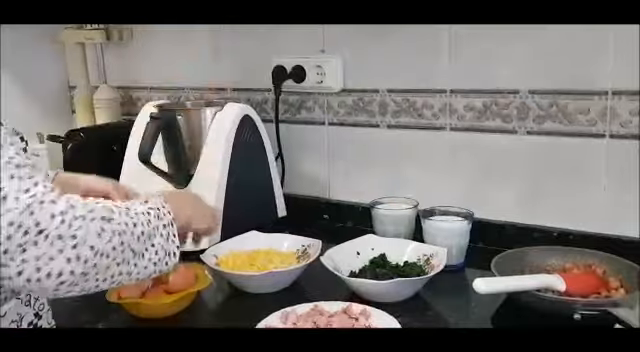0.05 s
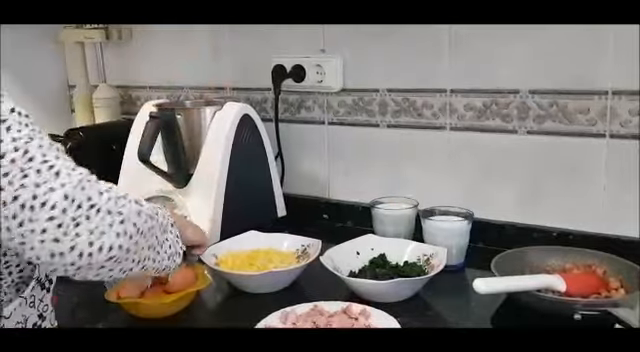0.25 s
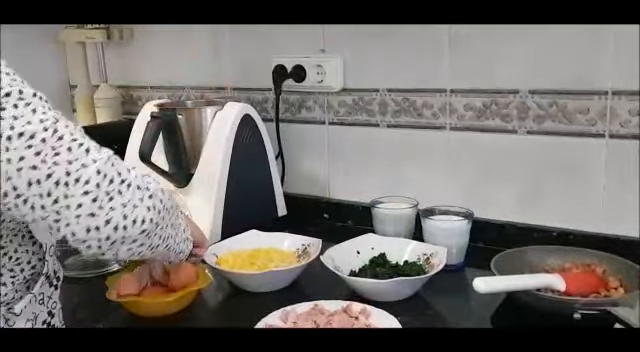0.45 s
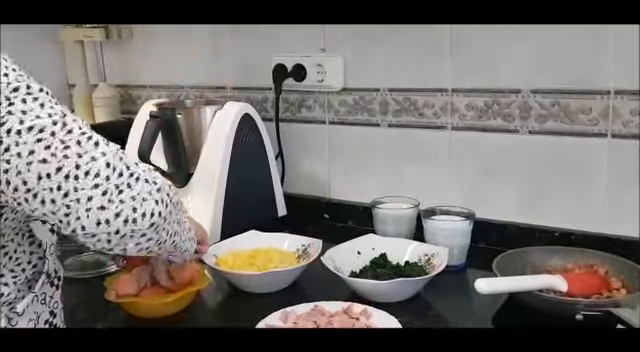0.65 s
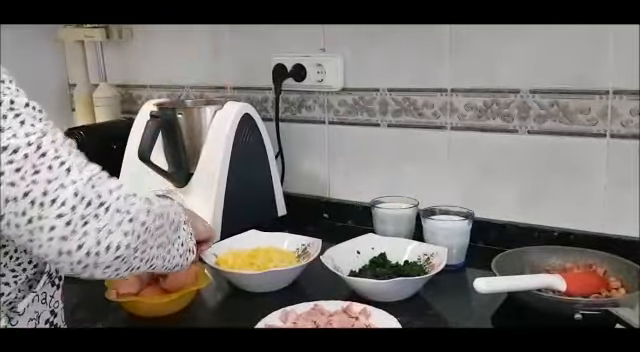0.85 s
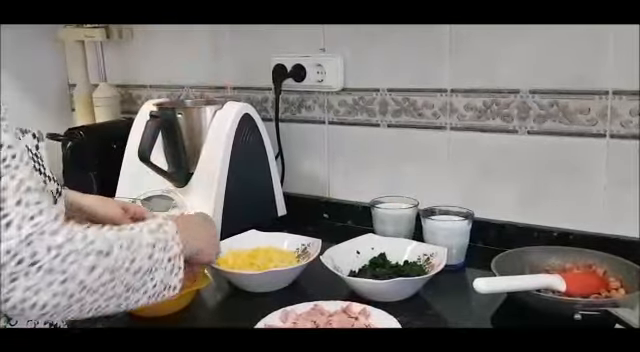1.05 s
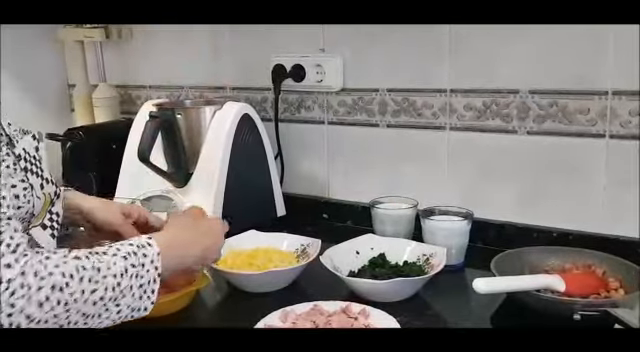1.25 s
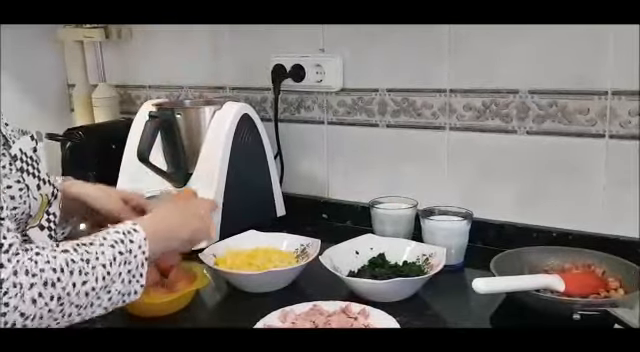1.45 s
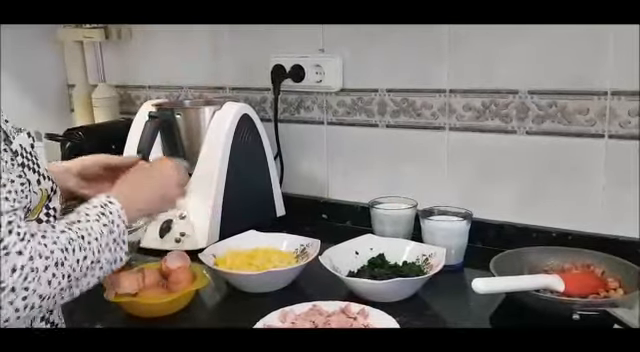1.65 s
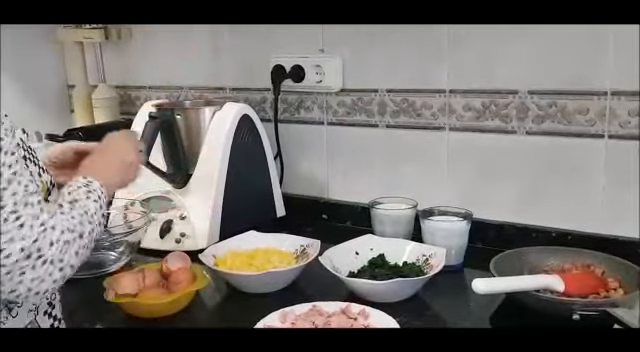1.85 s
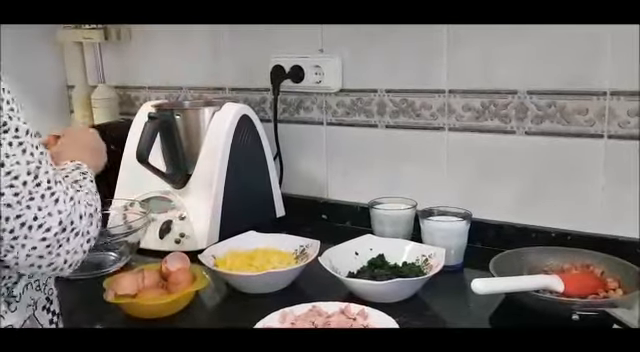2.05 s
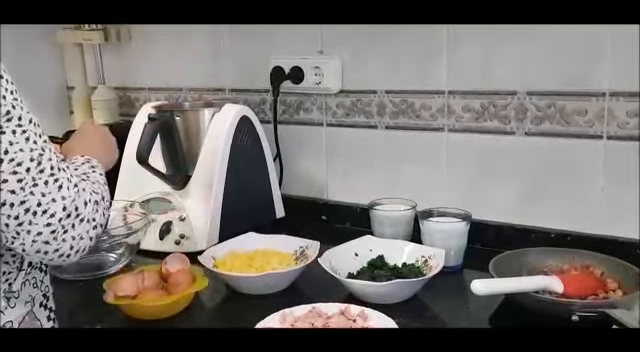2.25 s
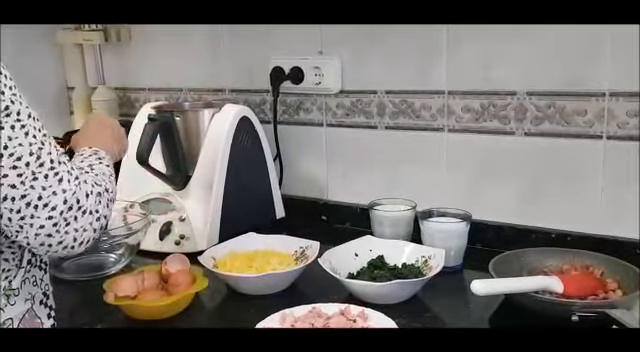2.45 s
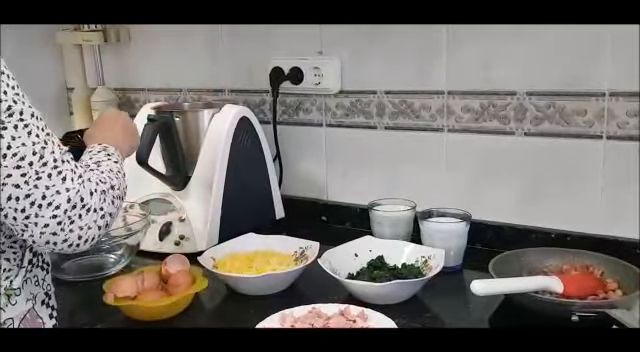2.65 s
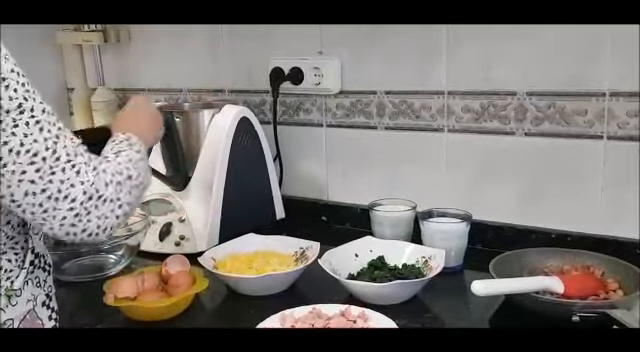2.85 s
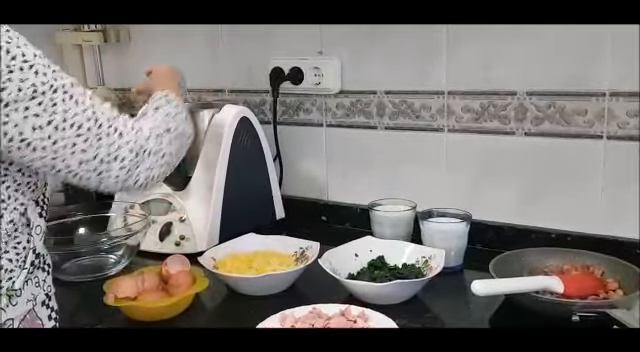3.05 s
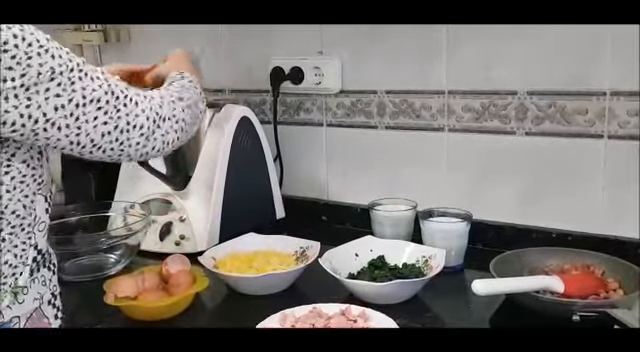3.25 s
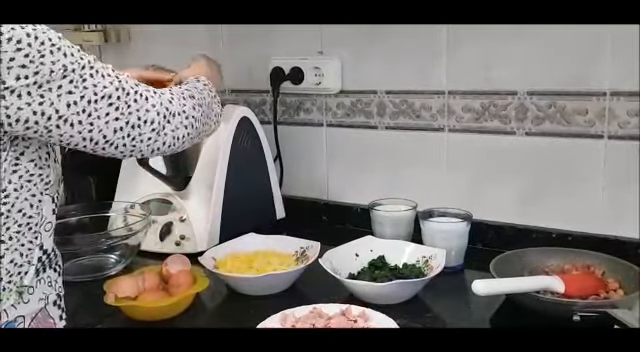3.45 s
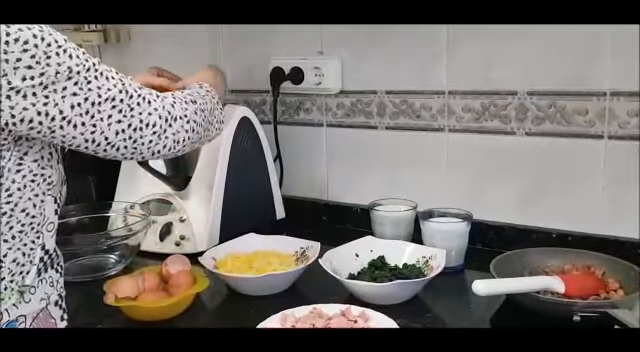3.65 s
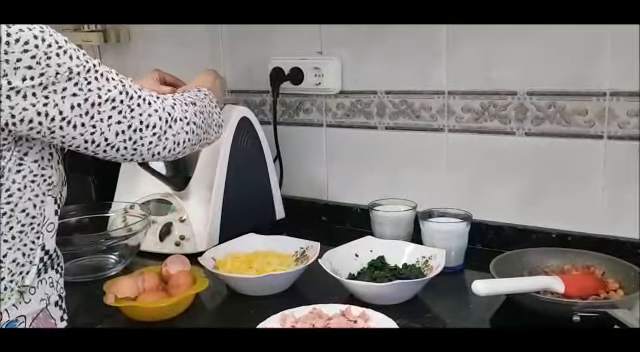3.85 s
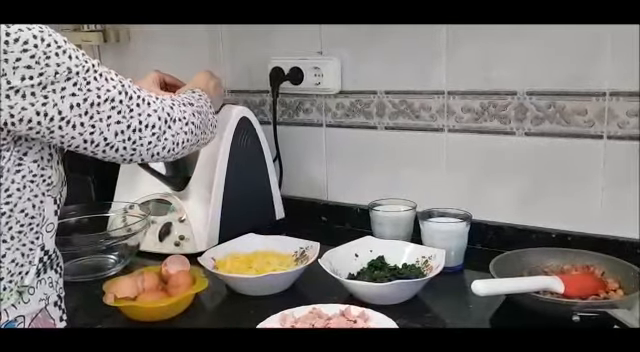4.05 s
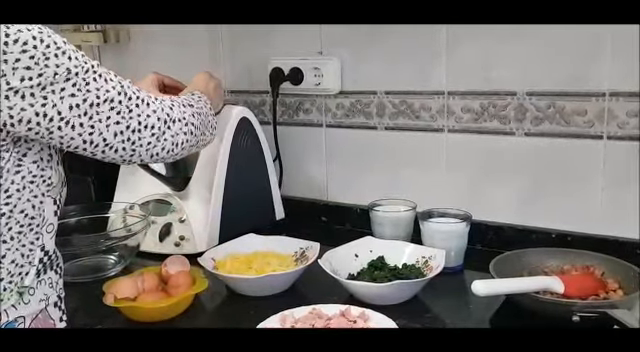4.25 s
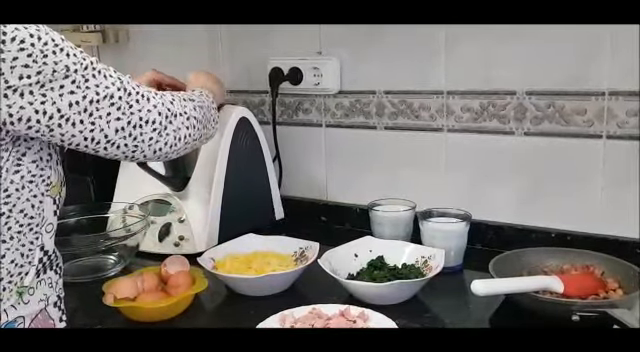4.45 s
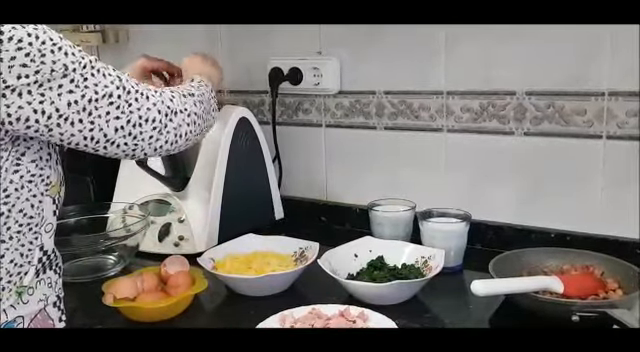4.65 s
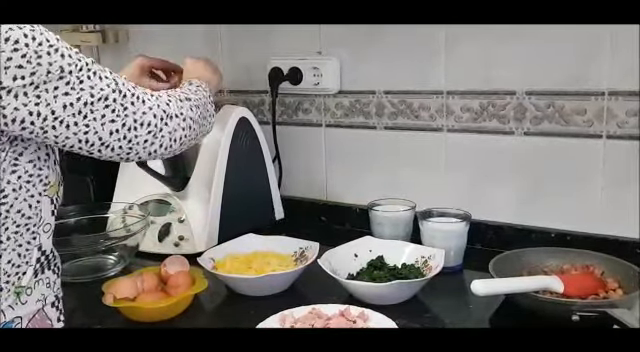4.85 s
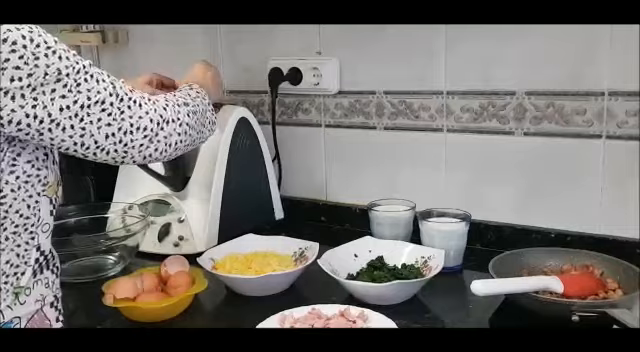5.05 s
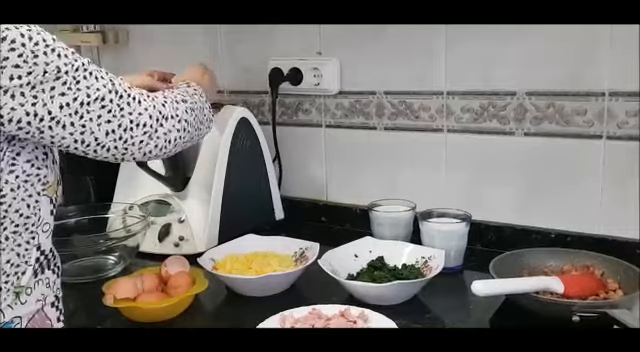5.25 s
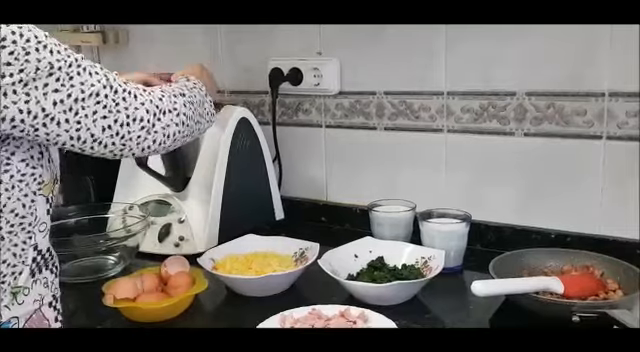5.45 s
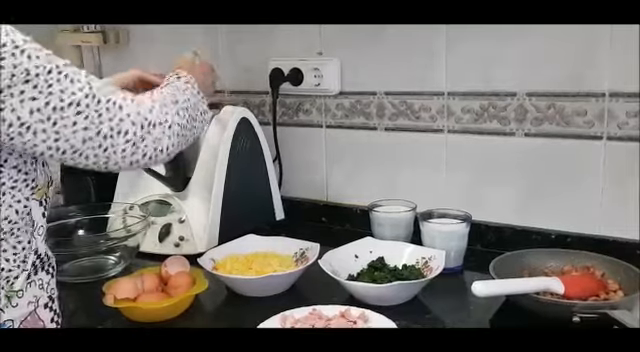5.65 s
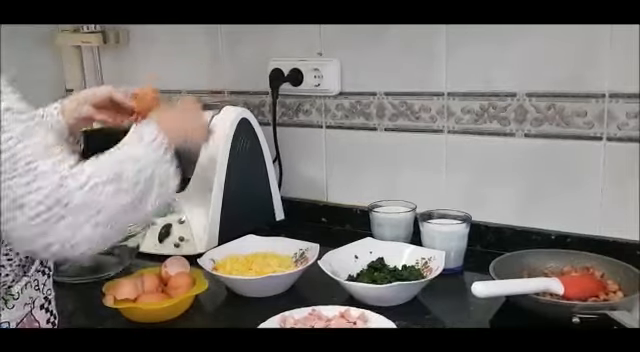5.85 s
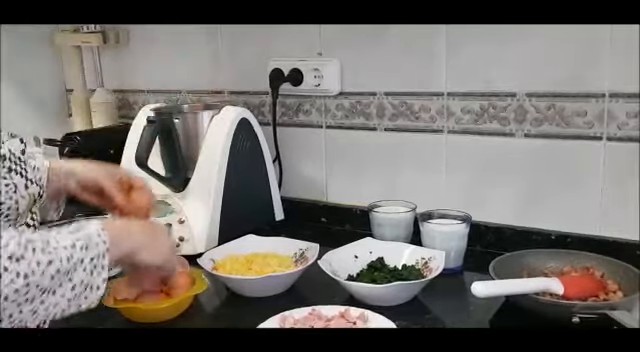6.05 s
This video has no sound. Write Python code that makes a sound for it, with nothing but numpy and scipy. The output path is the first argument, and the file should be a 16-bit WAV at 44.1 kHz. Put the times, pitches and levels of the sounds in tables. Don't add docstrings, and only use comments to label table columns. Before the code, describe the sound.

Eggshells clink and crunch in a bowl, then an egg is knocked sharply twice on a machine rim, crackles and is pulled open.

```python
import sys
import numpy as np
from scipy import signal
from scipy.fft import rfft, irfft
from scipy.io import wavfile
from scipy.ndimage import uniform_filter1d

SR = 44100
rng = np.random.default_rng(int(sys.argv[2]) if len(sys.argv) > 2 else 0)


def unload_audio(sound):
    columns = np.transpose(np.atleast_2d(sound))
    steps = np.round(np.clip(columns, -1, 1) * 32767)
    wavfile.write(sys.argv[1], SR, steps.astype(np.int16))


def elevation(decibels):
    levels = np.asarray(decibels, float)
    return 10 ** (levels / 20)


N = 269568

# frequency in Hz, level in dB.
SHELL_RADIATION = [(1800, 0.5), (2550, -3.5), (3700, 0.5), (5400, 1.5), (7000, -1.5), (8800, 1),
                   (13000, -1.5), (14600, 2.5)]


def evened(x):
    return x / np.sqrt(np.mean(x ** 2) + 1e-20)


def read(points, hz):
    f, value = np.transpose(points)
    return np.interp(np.log(hz + 1), np.log(f + 1), value)


def add(mix, start_s, sound):
    part = mix[max(round(start_s * SR), 0):][:len(sound)]
    part += sound[:len(part)]


def shape(x, gain):
    n = x.shape[-1]
    return irfft(rfft(x) * gain(np.fft.rfftfreq(n, 1 / SR)), n)


def smoothed(x, width):
    return uniform_filter1d(uniform_filter1d(x, width), width)


def paired(z, hz):
    # frequency in Hz, left-right likeness from 0 to 1.
    likeness = [(60, 0.82), (130, 0.71), (290, 0.84), (640, 0.5), (1410, 0.02), (3100, 0.05), (6820, 0.01),
                (15000, 0.01)]
    same = np.clip(read(likeness, hz), -1, 1)[:, None]
    return np.array([z[0], same * z[0] + np.sqrt(1 - same ** 2) * z[1]])


def ring(hz, t60_s):
    t = np.arange(8000) / SR
    return np.sin(2 * np.pi * hz * t) * elevation(-60 * t / max(t60_s, .002))


def small(x):
    return shape(x, lambda f: f ** 2 / (f ** 2 + 450 ** 2))


def lifted(steady_db, swells):
    t = np.arange(N) / SR
    power = elevation(2 * steady_db)
    for middle_s, half_s, db in swells:
        power = power + elevation(2 * db) * np.exp(-((t - middle_s) / half_s) ** 2)
    return np.sqrt(power)


def air():
    # frequency in Hz, density in dB per Hz.
    hum_spectrum = [(15, -28), (25, 7), (54, 3.5), (98, -8.5), (140, -1), (171, -22.5), (209, 8),
                    (245, -14.5), (288, -5), (505, -16), (642, -17), (1170, -38.5), (1710, -22.5),
                    (1930, -40.5), (3000, -54.5), (3900, -104), (6600, -120)]
    hiss_spectrum = [(1180, -7.5), (2000, -5.5), (2450, -13.5), (2950, -15), (3230, -15), (4600, -10.5),
                     (6600, -10.5), (8250, -8.5), (15200, -5.5), (16200, -7), (16600, -31.5)]
    # frequency in Hz, level in dB.
    drones = [(220.7, -70.5), (269.2, -72), (635.2, -77.5)]
    # middle in seconds, half length in seconds, rumble in dB, rustle in dB.
    moves = [
        (0.02, 0.22, -93, -65),
        (0.515, 0.25, -56.5, -71),
        (1.01, 0.07, -66, -49.5),
        (1.3, 0.31, -56, -72),
        (2.147, 0.43, -81, -63.5),
        (2.846, 0.096, -58.5, -69),
        (3.47, 0.233, -56, -85),
        (4.457, 0.14, -71.5, -63),
        (4.98, 0.12, -63.5, -91),
        (5.503, 0.32, -58, -73),
    ]
    hum_db, hum_wander_db, hiss_db = -62, 0.5, -74.5

    frames, hz = N // 512 + 5, np.fft.rfftfreq(2048, 1 / SR)
    a, b, c, d, patches = rng.standard_normal((frames, 1025, 5)).T
    patches = evened(uniform_filter1d(uniform_filter1d(patches, 10, 0), 8, 1))
    z = paired([a + 1j * b, c + 1j * d], hz) * elevation(1.7 * patches)

    middle_s, half_s, rumble_db, rustle_db = np.transpose(moves)
    wander = elevation(hum_wander_db * evened(smoothed(rng.standard_normal(N), 6000)))
    hum_level = wander * lifted(hum_db, zip(middle_s, half_s, rumble_db))
    hiss_level = lifted(hiss_db, zip(middle_s, half_s, rustle_db))
    out = 0
    for spectrum, level in (hum_spectrum, hum_level), (hiss_spectrum, hiss_level):
        layer = signal.istft(z * elevation(read(spectrum, hz))[:, None], nperseg=2048, noverlap=1536)[1][:, :N]
        out = out + level * evened(layer)

    for (line_hz, db), waver in zip(drones, rng.standard_normal((len(drones), 2, N))):
        drift, swell = evened(smoothed(waver, 3000))
        phase = 2 * np.pi * np.cumsum(line_hz + 3.27 * drift) / SR
        out = out + elevation(db + 2.0 + 2 * swell) * np.sin(phase)
    return out


def kitchen(x, count=3):
    # frequency in Hz, t60 in seconds.
    decay = [(100, 0.26), (260, 0.4), (700, 0.35), (1840, 0.35), (4850, 0.35), (12800, 0.27)]
    first_s = .0015
    t, out = np.arange(SR) / SR, np.zeros((2, N))
    for k in range(count):
        chance = np.minimum(1500 + 2.0e5 * t, 9000) / SR
        taps = rng.choice([-1., 1.], (2, SR)) * (rng.random((2, SR)) < chance)
        onset = np.clip((t - first_s) / 0.00028, 0, 1)
        taps = taps * onset / np.sqrt(np.minimum(1500 + 178000.0 * t, 9000))
        hz, frame_s, z = signal.stft(taps, SR, nperseg=256)
        z = paired(z, hz) * elevation(-60 * frame_s / read(decay, hz)[:, None])
        tail = signal.istft(z, SR, nperseg=256)[1][:, :SR] * (t > first_s)
        tail = tail / np.linalg.norm(tail[0])
        turn = np.sqrt(2 / count) * np.cos(np.pi * (1.7 * np.arange(N) / SR + k / count))
        out += signal.fftconvolve((x * turn)[None], tail, axes=1)[:, :N]
    return out


def counter(x):
    t = np.arange(1500) / SR
    fading = elevation(-5 - 60 * t / .04) * (t > .0008)
    echoes = rng.choice([-1., 1.], (2, 1500)) * (rng.random((2, 1500)) < 1400 / SR) * fading
    echoes[[0, 1], [0, 7]] = 1
    return signal.oaconvolve(x[None], echoes, axes=1)[:, :N]


def thud(db, contact_s, feet_db):
    # frequency in Hz, level in dB, t60 in seconds.
    housing_modes = [(157.7, -4, 0.81), (214.4, -9.5, 0.92), (287.8, 6, 0.37), (507.5, 0, 0.33),
                     (676, -9, 0.3), (725, -40, 0.33)]
    feet_modes = [(70, -14, 0.33), (128.6, -6.5, 0.41)]
    t = np.arange(SR // 2) / SR
    sound = 0
    for modes, lift_db in (housing_modes, 0), (feet_modes, feet_db):
        for hz, level_db, t60_s in modes:
            sound = sound + elevation(level_db + lift_db - 60 * t / (0.66 * t60_s)) * np.sin(2 * np.pi * hz * t)
    push = np.hanning(max(round(contact_s * SR), 5))
    sound = signal.oaconvolve(sound * (1 - np.exp(-t / 0.0033)), push)
    return elevation(db - 4.5) * sound / abs(sound).max()


def machine():
    # start in seconds, housing ring in dB, contact in seconds, puff in dB, feet in dB.
    pushes = [
        (0.512, -35.5, 0.00083, -35.5, -14),
        (0.998, -38, 0.0026, -45, 0),
        (1.471, -38, 0.00067, -48, -6),
        (2.48, -23, 0.0041, -30, 2.5),
        (2.74, -22, 0.0041, -31, 0.7),
        (3.418, -54, 0.0029, -54, 0.5),
        (3.515, -56, 0.0035, -71, -2),
        (5.371, -39.5, 0.003, -45, 3),
        (5.417, -35, 0.0028, -48.5, -0.5),
    ]
    housing, puffs = np.zeros((2, N))
    for start_s, db, contact_s, puff_db, feet_db in pushes:
        add(housing, start_s - .002, thud(db, contact_s, feet_db))
        add(puffs, start_s, elevation(puff_db + 14) * ring(0.85 / max(contact_s, 5e-4), 3.0 * contact_s))
    return housing, puffs


def rubbing(length_s, clatter_db, grit_db, hz):
    t = np.arange(0, length_s, 1 / SR)
    pressure = elevation(np.interp(t / length_s, [0, 0.33, 1], [-15.5, 0, -14]))
    sign, size, draw, shell = rng.random((len(t), 4)).T
    contacts = np.sign(sign - .5) * elevation(-5.0 * np.log(size + 0.021)) * (draw < 500 / SR)

    clatter, r = 0, np.exp(-np.pi * 650 / SR)
    sizes = (.66, 1.4), (.88, -.3), (1.08, -0.4), (1.4, -0.4), (.55, -9), (2.2, -10.5)
    for k, (ratio, db) in enumerate(sizes):
        turn = np.exp(2j * np.pi * ratio * hz * t)
        taps = contacts * (np.floor(4 * shell) == k % 4) / turn
        clatter = clatter + elevation(db) * (turn * signal.lfilter([1], [1, -2 * r, r * r], taps)).real

    def grit_gain(f):
        return elevation(read(SHELL_RADIATION, f)) / (1 + (3000 / (f + 1)) ** 4) / (1 + (f / 11000) ** 2)

    grit = shape(contacts, grit_gain)
    fade = pressure * signal.windows.tukey(len(t), .05)
    return fade * (elevation(clatter_db - 10.0) * evened(clatter) + elevation(grit_db - 8.5) * evened(grit))


def knock(db, hz, t60_s, slap_db):
    sound = ring(hz, t60_s) + 0.13 * ring(1.1 * hz, 0.2 * t60_s)
    sound = sound + elevation(slap_db + 5.5) * ring(0.8 * hz, 0.0013)
    sound = sound * (1 - np.exp(-np.arange(len(sound)) / SR / 0.00032))
    return elevation(db - 3.5) * sound / abs(sound).max()


def knocking():
    # start in seconds, blow in dB, pitch in Hz, room in dB.
    slaps = [(0.385, -30, 1920, 2.5), (0.409, -35, 1700, 6), (0.498, -29.5, 1580, 10),
             (0.612, -38.5, 1440, 14), (.585, -38, 1590, 11), (.635, -40, 1490, 8.5),
             (0.724, -27.5, 1830, 2.5), (0.754, -35.5, 1860, 8), (0.925, -29, 1110, 6),
             (0.948, -25.5, 1990, 1), (0.975, -30, 1890, 13), (1.016, -20, 1980, 4.5),
             (1.254, -31.5, 1740, 6), (1.31, -35, 1600, 5), (1.344, -21, 2230, -0.5),
             (1.377, -12, 2020, 2.5), (1.416, -22, 2330, 0), (1.475, -15, 1700, -3),
             (1.565, -19.5, 1500, 1), (1.65, -29, 1700, 1), (1.739, -28, 1960, 7.5),
             (2.476, -17, 2270, -1.5), (2.742, -24, 1220, 7), (3.455, -54.5, 2450, 3),
             (3.969, -46, 1690, 2), (4.447, -47.5, 1940, 7), (5.169, -52, 2630, 4.5),
             (5.561, -37.5, 2200, 7.5)]
    # start
    # in seconds, blow in dB, pitch in Hz, t60 in seconds.
    clinks = [(0.178, -53, 1270, 0.032), (0.279, -42.5, 1430, 0.0075), (.475, -38, 1450, .012),
              (0.522, -34, 1320, 0.018), (0.5674, -36, 1300, 0.009), (.8412, -45, 2160, 0.0093),
              (.8886, -46, 2160, 0.011), (.906, -41, 2470, 0.0066), (1.011, -39, 1800, 0.011),
              (1.2138, -42, 2600, 0.0087), (1.2442, -36, 1650, 0.015), (1.356, -35, 2140, .01),
              (1.347, -31, 1150, .006), (1.39, -26, 1150, .006), (.895, -38, 1050, .008),
              (.82, -46, 2900, .006), (1.364, -37, 1990, .01), (1.57, -27.5, 1140, 0.016),
              (1.76, -38.5, 2054, .015), (5.3, -45, 2670, .012), (5.386, -54, 2690, 0.015),
              (5.56, -46, 1330, .03), (0.995, -21, 1530, 0.022), (1.029, -27, 1500, 0.009),
              (1.089, -27.5, 1325, 0.021), (1.151, -37, 1306, 0.026), (1.238, -33, 1490, 0.0045),
              (1.441, -21, 1210, 0.0077), (1.594, -29.5, 1150, 0.03), (1.619, -29.5, 1620, 0.025),
              (1.7, -33, 1710, 0.017), (.95, -33, 1250, .008), (.992, -32, 2700, .005),
              (1.19, -45, 2700, .008), (.86, -41, 1000, .008),
              (4.57, -50, 2500, .008), (5.372, -43, 1850, .012), (5.575, -44, 3900, .005),
              (5.61, -47, 3300, .006), (2.448, -55.5, 2320, 0.012), (2.4805, -14.5, 1300, 0.0067),
              (2.475, -22, 2200, .005), (2.494, -24, 1240, .025), (3.967, -57, 1500, 0.019),
              (4.2515, -36.5, 1350, 0.0055), (4.261, -52, 2680, 0.0027), (4.445, -33.5, 1326, 0.021),
              (4.4996, -31, 1723, 0.02), (4.507, -39, 1510, .03), (4.518, -37.5, 1400, 0.022),
              (4.549, -46.5, 1610, .025), (5.251, -35.5, 2200, 0.011), (5.298, -35.5, 2110, 0.018),
              (5.307, -41, 2360, 0.013), (5.39, -43, 2300, 0.012), (5.573, -39, 1890, 0.011),
              (5.318, -44, 1817, 0.04), (5.382, -40, 2120, 0.012), (5.457, -51, 2990, 0.012),
              (5.534, -44, 1890, 0.015), (5.586, -37, 1865, 0.014)]
    # start in seconds, level in dB, frequency in Hz, t60 in seconds, room in dB.
    ringing_modes = [(4.259, -49, 3880, 0.062, -7), (4.264, -53, 489, 0.07, 1), (4.259, -61.5, 2370, 0.037, 0),
                     (4.5175, -48, 8300, 0.0089, 4), (4.5175, -50, 5300, 0.011, 9), (4.446, -56, 8300, .006, 7),
                     (4.566, -47.5, 1340, 0.11, -9), (2.48, -35, 674, 0.16, -9.5), (2.485, -37, 560, .05, 6),
                     (2.482, -30, 1157, .12, -6), (2.742, -39, 705, 0.3, -5), (2.744, -35, 400, .04, 5),
                     (2.484, -36, 880, 0.1, -5.5), (2.478, -39, 790, .04, -4.5), (2.74, -39.5, 3080, 0.0042, 5.5),
                     (2.74, -43, 1650, 0.0058, 6), (2.477, -41, 2850, .03, -4), (2.485, -40, 2300, 0.11, -4.5),
                     (5.41, -48.5, 370, .15, -2), (2.482, -32.5, 1270, 0.17, -8), (1.343, -31.5, 2100, .018, -9),
                     (2.745, -43, 1300, 0.16, -3), (4.2536, -48, 4900, 0.025, -1), (4.2526, -48, 6200, 0.018, 6),
                     (4.2522, -46.5, 4870, 0.0099, 5), (4.518, -51, 4270, 0.0081, 7), (2.478, -31, 710, 0.008, 1.5),
                     (2.495, -28.5, 1600, 0.013, 1.5), (2.74, -37, 707, 0.02, 3), (5.385, -45, 436, 0.23, -1.5),
                     (5.303, -50.5, 1320, 0.043, -1),
                     (1.345, -42, 2800, .008, 0),
        (1.383, -35.5, 2970, .01, 2.5),
        (1.355, -45, 2900, .008, 0),
        (1.44, -48, 3700, .008, 5),
        (1.474, -44.5, 3650, 0.011, 4),
        (5.175, -62, 3800, .006, 9),
        (3.47, -70.5, 2500, 0.017, 7),
        (2.8, -56, 1800, .03, -1),
        (2.752, -50, 3100, .02, 5),
        (2.742, -32.5, 563, 0.018, 1.5),
    ]
    # start in seconds, length in seconds, clatter in dB, grit in dB, pitch in Hz.
    strokes = [(0.203, 0.43, -58, -68.5, 1370), (0.401, 0.22, -40.5, -58, 1540),
               (0.519, 0.25, -54, -67, 1460), (0.76, 0.22, -43.5, -58, 1610), (0.451, 0.15, -43, -47, 1350),
               (0.561, 0.1, -38, -56.5, 1587), (0.823, 0.064, -48, -47.5, 2130),
               (0.89, 0.051, -41, -54, 2100), (1.208, 0.089, -40, -58.5, 1700),
               (0.86, 0.22, -36, -43.5, 1480), (1.094, 0.28, -48.5, -53, 1580),
               (1.256, 0.16, -68, -51.5, 1700), (1.519, 0.227, -36.5, -56, 1660),
               (1.601, 0.22, -45, -55, 2050), (3.38, 0.17, -74, -66.5, 2220),
               (3.952, .16, -61.5, -74, 1610), (4.441, 0.25, -53.5, -69, 1510),
               (5.197, 0.36, -54, -52.5, 2100), (5.401, 0.24, -50, -54.5, 1920)]
    # frequency in Hz, level in dB, t60 in seconds.
    bowl_modes = [(525, -0.5, .03), (680, 0.5, .03), (860, -3.5, 0.021)]
    bowl_db, bowl_until_s = -65.5, 1.9

    straight, spread, rest = np.zeros((3, N))
    blows = [(s, db, hz, 0.017, 19, room_db) for s, db, hz, room_db in slaps]
    for s, db, hz, t60_s in clinks:
        room_db = 2.5 - 3.5 * np.log2(t60_s / 0.011)
        blows.append((s, db, hz, t60_s, -19, room_db))
    for start_s, *blow, room_db in blows:
        add(straight, start_s - .001, knock(*blow))
        add(spread, start_s - .001, elevation(room_db + 1.5) * knock(*blow))
    for start_s, db, hz, t60_s, room_db in ringing_modes:
        add(straight, start_s, elevation(db + 9.0) * ring(hz, t60_s))
        add(spread, start_s, elevation(db + 4.5 + room_db) * ring(hz, t60_s))
    for start_s, *stroke in strokes:
        add(rest, start_s, rubbing(*stroke))

    body = sum(elevation(db) * ring(hz, t60_s) for hz, db, t60_s in bowl_modes)
    drive = (straight + rest) * (np.arange(N) < bowl_until_s * SR)
    bowl = elevation(bowl_db) * evened(signal.oaconvolve(drive, body)[:N])
    return small(np.array([elevation(-1) * straight + rest + bowl, spread + rest + bowl]))


def snap(db, hz, octaves, flat, noise):
    t = np.arange(len(noise)) / SR
    parts = np.array([t == 0, 0.12 * noise * abs(noise) * np.exp(-t / 0.0028)])
    parts = np.roll(parts, 256, axis=1)

    def crack_gain(f):
        peak = np.exp(-.5 * (np.log2((f + 1) / hz) / max(octaves, .1)) ** 2)
        return elevation(read(SHELL_RADIATION, f)) * (abs(flat) * f / (f + 1500) + peak)

    click, splinters = shape(parts, crack_gain)
    return elevation(db + 5.5) * np.array([click + splinters, click]) / abs(click).max()


def cracking():
    # start in seconds, snap in dB, brightest frequency in Hz, breadth from 0 to about 1.
    shards = [(0.3002, -49, 5770, 0.1), (0.384, -32.5, 6050, 0.6), (0.3895, -24.5, 3800, 0.77),
              (.345, -58, 5500, .1), (.401, -29.5, 6000, .6), (.415, -33, 4500, 0.4),
              (0.4768, -33, 4160, 0.26), (.51, -32.5, 5950, 0.2), (.675, -52, 6000, .15),
              (.829, -36, 6500, 0.5), (.846, -33, 5260, 0.4), (.858, -36, 5500, .3), (.905, -34, 6000, 0.2),
              (1.011, -26, 9000, .3), (1.021, -23, 9490, .5), (1.032, -31, 8000, 0.5),
              (1.225, -40, 5500, 0.06), (1.245, -38, 5300, 0.2), (1.26, -43, 4500, .2),
              (1.33, -38, 7000, .5), (1.381, -19, 12500, 0.7), (1.58, -38, 9200, 0.5),
              (1.651, -37, 8000, .5), (1.477, -28.5, 4930, 0.35), (1.7432, -29.5, 9000, 0.4),
              (1.757, -38, 6000, 0.2), (0.7243, -38, 5990, .4), (0.7532, -35, 5470, 0.4),
              (0.8367, -34, 5796, 0.3), (0.9702, -24, 3673, 1), (1.0161, -13.5, 8090, 0.48),
              (1.0869, -21.5, 11560, 1), (1.1508, -32.5, 4680, 1), (1.3763, -13.5, 11600, 0.24),
              (1.3902, -31, 5640, 0.08), (1.5628, -29.5, 3310, 0.22), (1.5943, -23.5, 3930, 0.66),
              (1.6801, -37, 3814, 0.9), (1.7389, -29, 5660, 1)]
    cracks = [(2.4758, -3.5, 7750, 0.95), (2.4816, -12, 11700, 0.09), (2.738, -9.5, 5450, 1.1),
              (3.4441, -40, 11670, 0.8), (3.53, -41.5, 9160, 0.05), (3.948, -46, 9040, 0.45),
              (3.969, -39, 8500, 0.3), (4.1962, -49.5, 8660, 0.13), (4.2528, -25.5, 5350, 0.13),
              (4.2528, -23, 11400, 0.25), (4.4445, -36, 8500, 0.27), (4.498, -38, 3830, 0.8),
              (4.518, -23, 9000, 0.7), (4.5503, -35.5, 5230, 0.16), (4.995, -35.5, 13100, 0.38),
              (5.1624, -34.5, 12760, 0.9), (5.1822, -31.5, 9120, 0.9), (5.2, -38.5, 3500, 0.4),
              (5.2496, -27, 5400, 0.57), (5.3036, -30, 3240, 0.33), (5.4554, -29.5, 9100, 1),
              (5.469, -28.5, 10400, 0.4), (5.5282, -24, 7060, 0.9), (5.5564, -30, 9100, 0.54),
              (5.565, -24, 9000, 0.9), (5.5745, -25, 12000, 1), (5.587, -38, 9000, 0.9),
              (5.405, -39.5, 9000, 0.16), (4.4405, -44, 7000, 0.7)]
    straight, spread = np.zeros((2, N))
    snaps = shards + cracks
    for (start_s, db, hz, breadth), noise in zip(snaps, rng.standard_normal((len(snaps), 4096))):
        noise = noise * (np.arange(4096) < 3500)
        whole, click = snap(db, hz, 0.21 + breadth, breadth, noise)
        add(straight, start_s - 256 / SR, elevation(-8.5) * whole)
        add(spread, start_s - 256 / SR, elevation(-0.5) * click)
    return small(small(np.array([straight, spread])))


def scene():
    housing, puffs = machine()
    knocks, knocks_far = knocking()
    snaps, snaps_far = cracking()
    room = kitchen(knocks_far + puffs) + kitchen(snaps_far)
    shells = counter(knocks) + counter(snaps) + elevation(3) * room
    return shells + housing + air()


def roll_off(x):
    return signal.sosfilt(signal.butter(12, 16820, fs=SR, output="sos"), x)


def record(dry):
    # frequency in Hz, level in dB.
    colour = [(20, -19.5), (45, 0), (300, -4), (1000, 0.5), (3000, 7.5), (3800, 7), (4600, 2.5),
              (6000, 1.5), (9000, -1), (11000, 1.5), (16000, -4)]
    # frequency in Hz, left minus right in dB.
    port_difference = [(60, -1), (99, 5.5), (160, 0), (270, 1), (450, 1.5), (740, 2), (1220, -1),
                       (2010, -0.5), (3330, -3), (5500, 2), (9080, 12), (15000, 0)]
    side = np.array([[.5], [-.5]])

    def port_gain(f):
        return elevation(read(colour, f) + side * read(port_difference, f)) * f ** 4 / (f ** 4 + 42 ** 4)

    def band_limit(f):
        return elevation(np.interp(f, 15800 + np.array([0, 200, 850, 900]), [0, -22, -30, -120]))

    ports = shape(dry, port_gain)
    self_noise = shape(rng.standard_normal((2, N)), lambda f: 1 / (1 + (11000 / (f + 1)) ** 6))
    return roll_off(shape(ports + elevation(-66.0) * self_noise, band_limit))


dry = scene()
out = record(dry)
unload_audio(out)
```